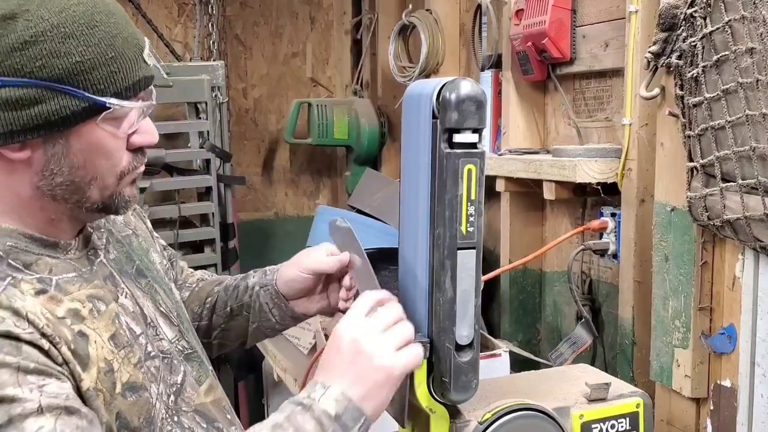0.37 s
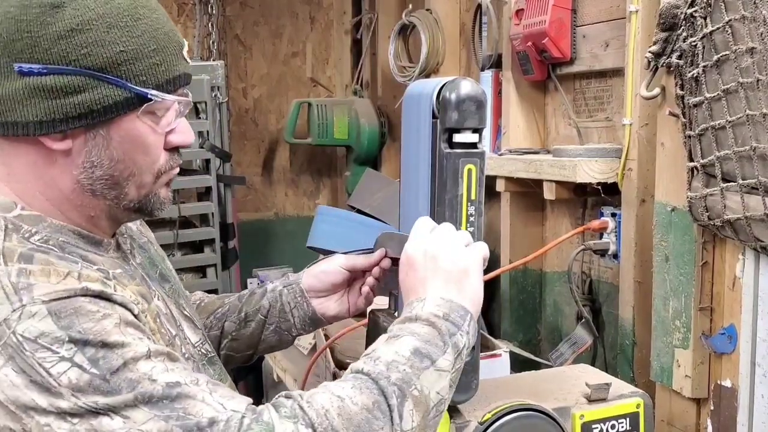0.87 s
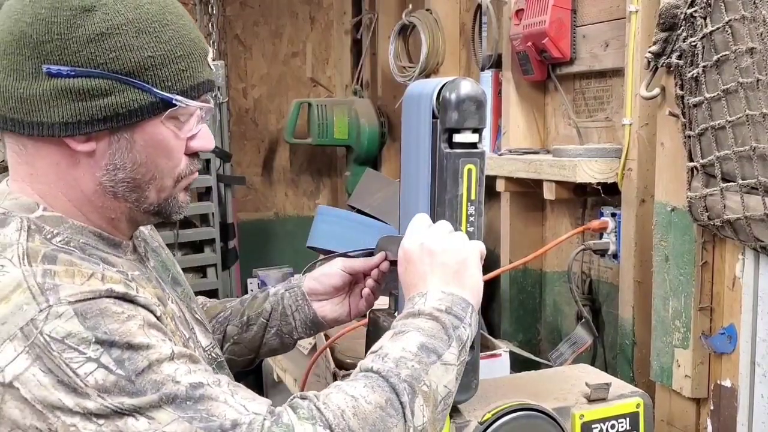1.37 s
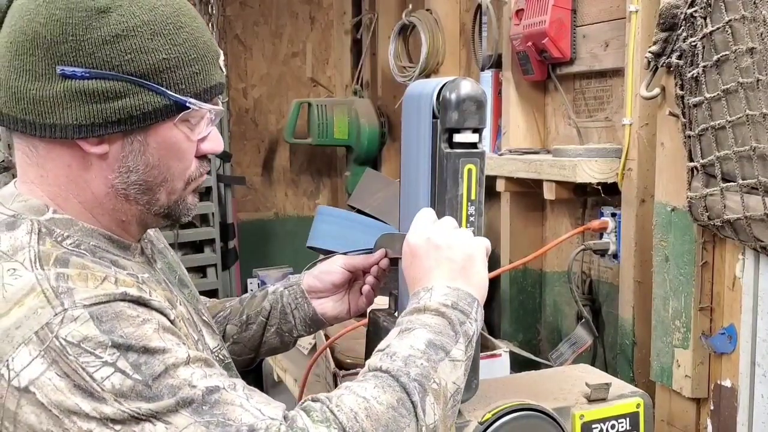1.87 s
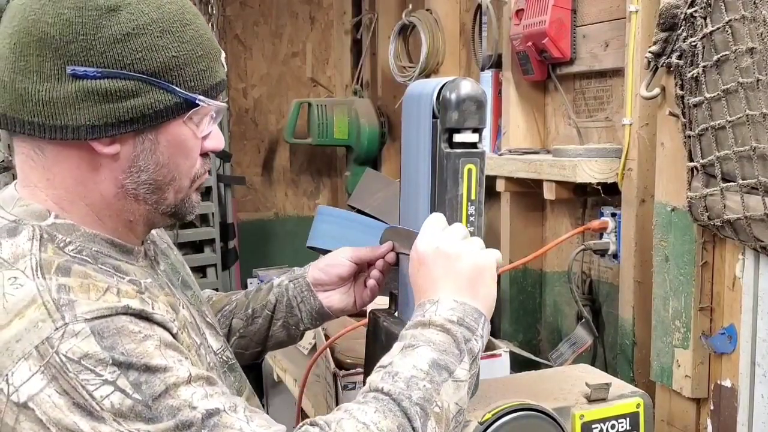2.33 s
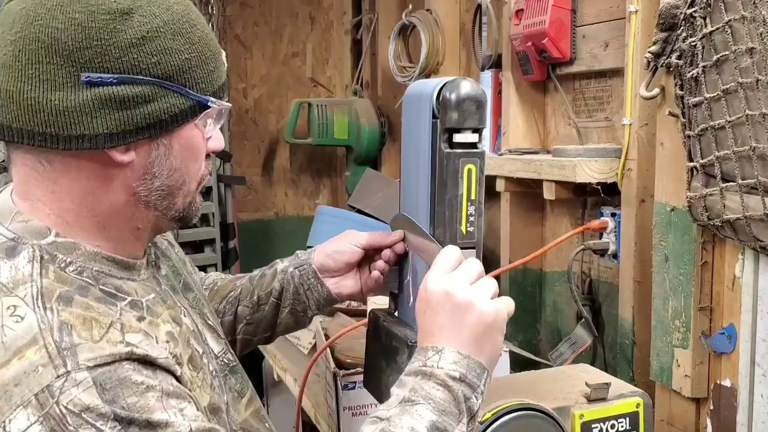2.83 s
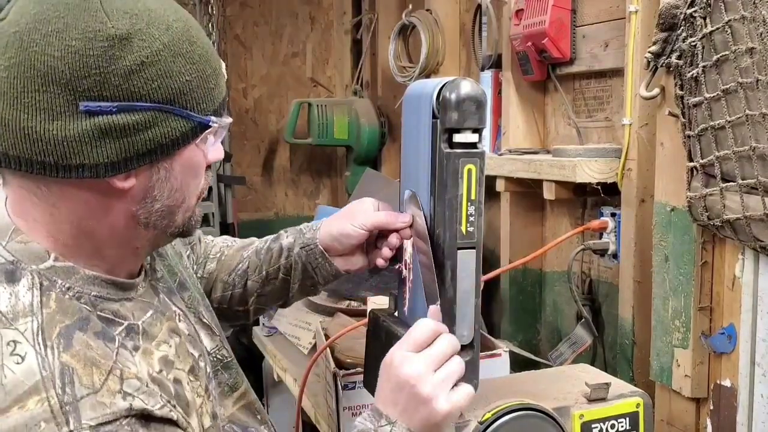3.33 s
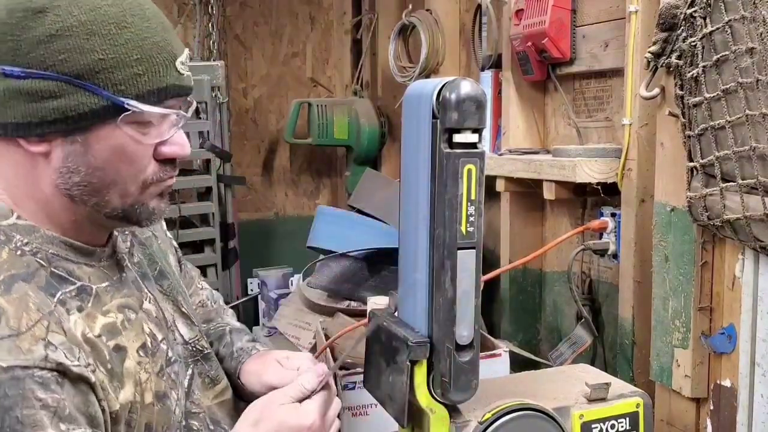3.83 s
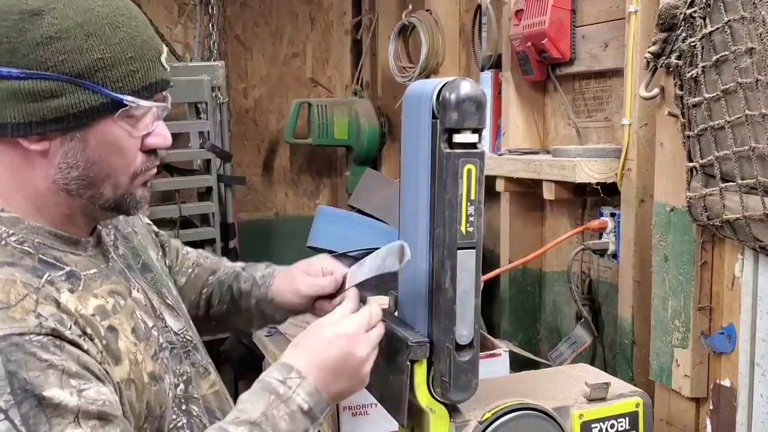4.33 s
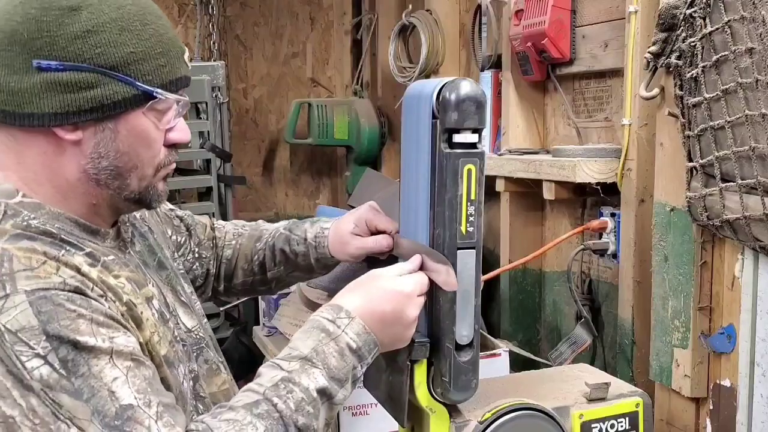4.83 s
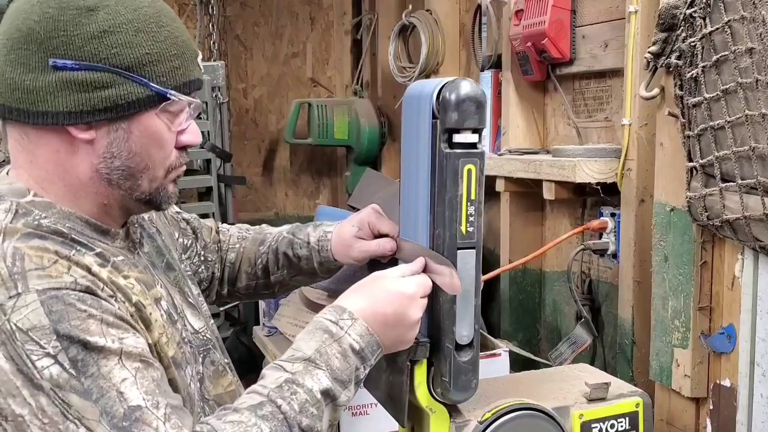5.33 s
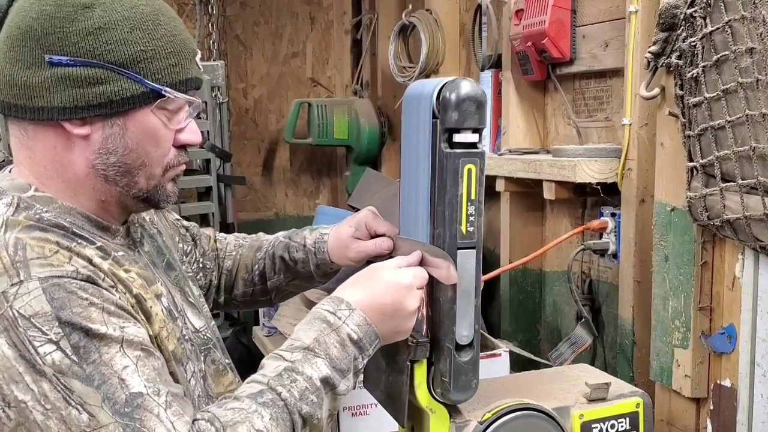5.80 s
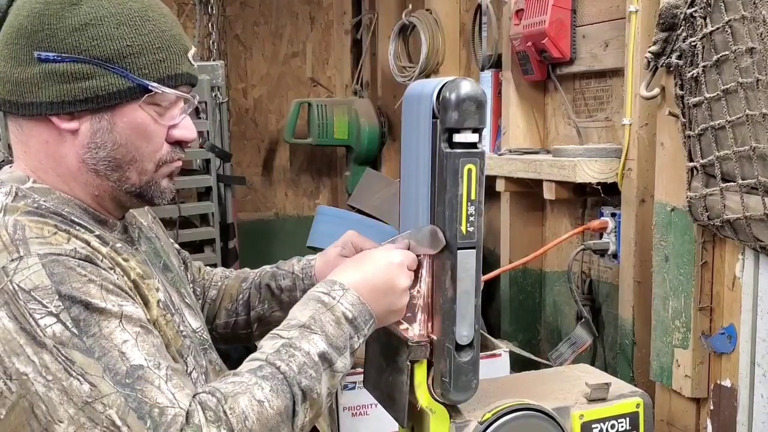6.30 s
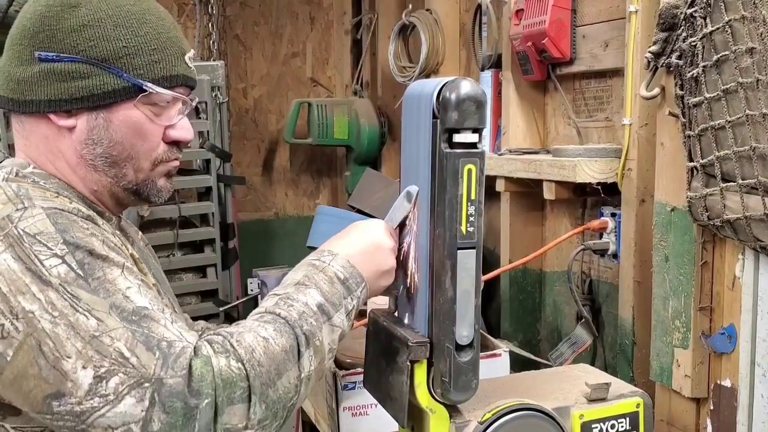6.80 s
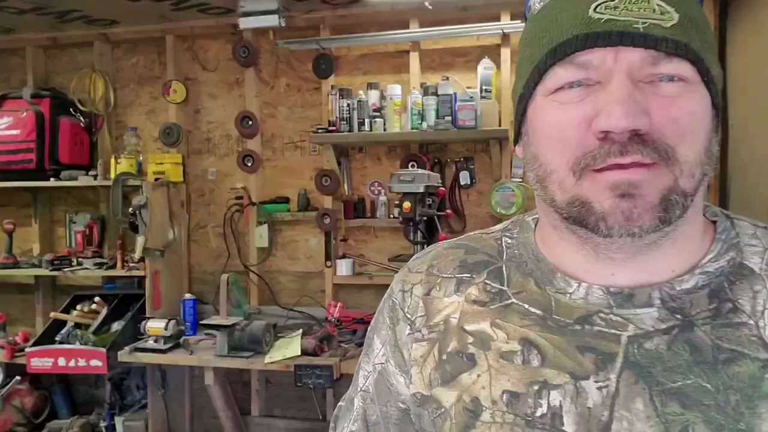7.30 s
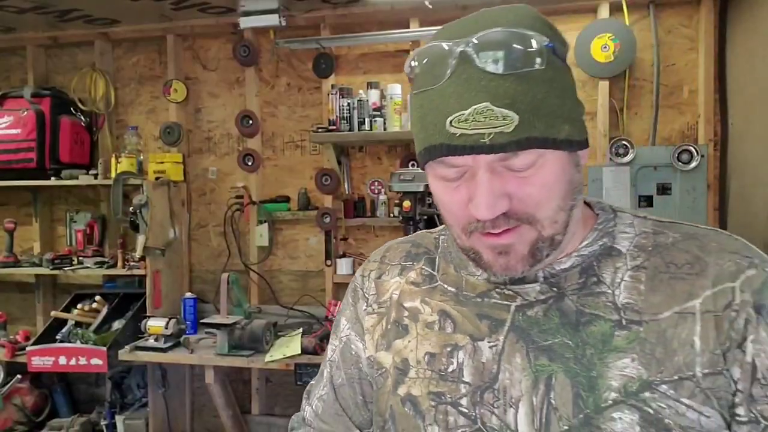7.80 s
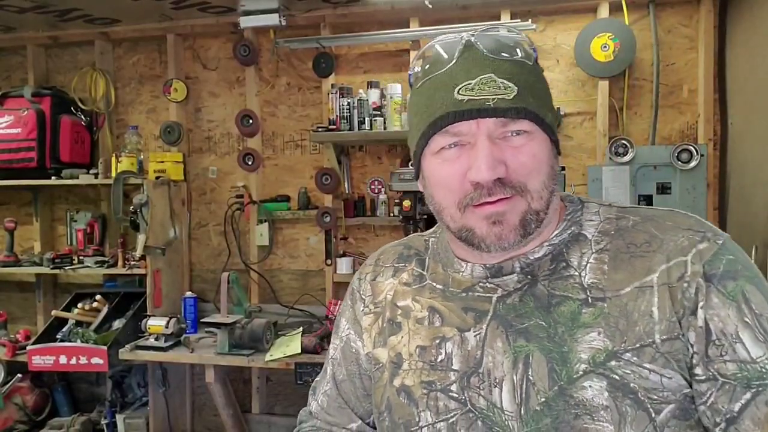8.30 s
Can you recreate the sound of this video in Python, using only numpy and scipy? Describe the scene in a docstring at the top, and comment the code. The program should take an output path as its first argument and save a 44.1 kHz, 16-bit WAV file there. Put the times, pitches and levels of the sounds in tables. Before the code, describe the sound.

A bench belt sander is already running close by in a wooden workshop: deep throbbing hum near 60 Hz, a whine around 950 Hz leaning left, broad belt rush and bench rumble. Between 0.2 and 1.4 s, brief thin squeaks from the belt seam flick by, stronger on the right. At about 1.8 s a steel blade touches the belt with bright gritty hiss and scrape; the whine sags slightly and the grinding surges from 2.5 s, its metallic resonance shifting as contact slides to the tip, until 3.9 s. The machine runs freely again, rumble returning. A second pass starts near 5.7 s, swelling in harsh bursts from 6.1 s. At 7.3 s everything fades almost instantly. Faint air settles quickly over a soft, far 70 Hz drone with tiny dips; a short sleeve rustle brushes past at 8.25 to 8.4 s. Two spaced microphones give a wide image.

```python
"""A bench belt sander runs in a wooden workshop: throbbing mains hum, whine partials, shaped-noise belt rush
and bench rumble, with brief noise squeaks from the belt seam. Two microphones set apart hear it.
A steel blade is ground in two passes, noise shaped by bending modes as the contact slides to the tip.
The sander then fades out quickly to the quiet shop: a low sine drone over air noise, then a noise rustle of cloth."""
import sys
import numpy as np
from scipy import signal
from scipy.fft import rfft, irfft, next_fast_len
from scipy.io import wavfile
from scipy.ndimage import uniform_filter1d, map_coordinates

SR = 44100
rng = np.random.default_rng(int(sys.argv[2]) if len(sys.argv) > 2 else 0)


def transcribe(u):
    """Save the signal u as a 16-bit wav file named by the first command-line argument.

    u: samples, shape (n,) or (channels, n), limited to [-1, 1]; the rate is SR.
    q: integer samples, one column per channel.
    """
    v = np.clip(np.atleast_2d(u).T, -1, 1)
    q = np.round(v * 32767).astype(np.int16)
    wavfile.write(sys.argv[1], SR, q)


def undo_db(level):
    """Turn decibels back into plain size, where 20 dB means ten times bigger."""
    steps = np.asarray(level, float) / 20
    return 10 ** steps


N = 370880
T_S = np.arange(N) / SR

# Noise spectra hold relative densities: each noise is scaled to rms 1 before its level is set.

# running machine, duller under the blade, before steps and wavers:
# (time [s], belt rush [dB], whine [dB], hum [dB])
MACHINE = [(0.0, -24, -27, -15.5), (0.57, -24, -27.5, -17), (1.5, -24.5, -27, -15), (1.96, -26, -28.5, -18),
           (2.04, -31, -31, -19.5), (2.45, -33, -30, -24.5), (2.8, -33.5, -30, -24.5),
           (3.25, -35.5, -35.5, -32), (3.89, -33, -35.5, -28.5), (3.96, -32, -34, -22),
           (4.45, -29, -33.5, -22.5), (4.6, -25.5, -27, -16.5), (5.3, -24.5, -29, -17),
           (5.79, -24.5, -28, -23), (5.89, -33, -36, -23), (6.2, -34, -32.5, -32.5),
           (6.6, -35.5, -32.5, -34), (6.95, -30.5, -31.5, -26.5), (7.32, -33.5, -33, -28.5)]
# right microphone's hum lag: (time [s], phase [rad])
HUM_LAG = [(0, 1.6), (2.4, 1.84), (4.4, 2.16), (5.6, 2.6), (7.32, 2.8)]
# motor whine: (time [s], frequency [Hz])
WHINE_SPEED = [(0, 954), (1.7, 954), (2.3, 951), (2.5, 947), (3.15, 946.5), (3.3, 949.5), (3.85, 949),
               (4, 954), (5.65, 954), (6, 951.5), (6.2, 948), (6.9, 948), (7.05, 950.5), (7.35, 950)]
# whine partials: (multiple of whine, level over whine [dB], right over left [dB], flicker scale [dB])
WHINE_PARTIALS = [(1, 6.5, -28, -0.75), (1.125, -12.5, -2, 4), (.876, -13.5, -10, 5), (1.5, -15.5, -5, 5),
                  (1.947, -16.5, 4.5, 1), (2.831, -18, -5.5, 6)]
# belt rush: (frequency [Hz], density [dB per Hz])
BELT_SPECTRUM = [(330, -63.5), (430, -12), (520, -9), (764, -12), (958, -3), (1260, -14), (1650, -14.5),
                 (2260, -17.5), (3000, -18.5), (5000, -20), (7500, -29), (9500, -26), (12000, -30.5),
                 (14600, -37.5)]
# housing resonances: (frequency [Hz], width [Hz], gain [dB])
HOUSING_MODES = [(681, 48, 8), (834, 350, 2), (1877, 150, 10.5), (2713, 44, 9.5)]
# belt rush treble in each microphone: (frequency [Hz], left [dB], right [dB])
BELT_TREBLE = [(9340, -0.7, -0.9), (10340, -6, 1.5), (11500, 4.5, 2.7), (12400, 3, 2), (13400, 1, -21),
               (14300, -9, -33)]
# bench, before steps and wavers: (time [s], rumble [dB], drumming of its top over rumble [dB])
BENCH_LEVELS = [(0.0, -30.5, -4.5), (1.7, -31, -6.5), (2.3, -46, -6.5), (2.5, -44.5, -22),
                (3.2, -47.5, -30), (3.6, -47.5, -20), (3.9, -40.5, -10), (4.5, -33.5, -9),
                (4.7, -29, -10.5), (5.75, -32.5, -5.5), (5.94, -47.5, -16), (6.1, -47.5, -22),
                (6.6, -50, -24), (6.95, -44.5, -8.5), (7.32, -46, -3)]
# bench rumble: (frequency [Hz], density [dB per Hz])
RUMBLE_SPECTRUM = [(70, -28), (100, -4), (125, -3), (190, -9), (285, -4.5), (310, -8.5), (340, -55.5)]
# bench top drumming: (frequency [Hz], density [dB per Hz])
BENCH_TOP_SPECTRUM = [(270, -36.5), (320, 0.5), (420, 5), (480, -26)]
# deep shaking of the floor: (frequency [Hz], density [dB per Hz])
SHUDDER_SPECTRUM = [(22, -32), (35, -6.5), (60, 0), (90, -4), (115, -44)]
# belt seam squeaks over a roller: (time [s], peak of swell [dB], Gaussian sd [s])
SQUEAKS = [(0.233, -42, .015), (.29, -43, 0.026), (0.356, -33, .02), (0.48, -36, .01), (.685, -34.5, 0.013),
           (0.908, -40.5, .01), (1.012, -33, 0.018), (1.075, -39.5, 0.0092), (1.147, -43.5, .006),
           (1.222, -43, .006), (1.416, -40, 0.028)]
# blade on the belt, one table a pass, before steps: (time [s], grit hiss [dB], blade body over hiss [dB])
GRIND_PASSES = [
    [(1.755, -46, 0), (1.78, -20.5, -11.5), (1.85, -25.5, -4), (2.1, -17.5, -12.5), (2.2, -19, -7.5),
     (2.8, -21.5, -5.5), (3.18, -18.5, -10), (3.3, -16, -8.5), (3.6, -17.5, -7), (3.89, -21.5, -5.5),
     (3.925, -38, 0)],
    [(5.678, -45.5, -1.5), (5.688, -25, -9.5), (5.76, -24, -4.5), (5.85, -16, -10), (6.05, -18.5, -8.5),
     (6.15, -19, -8), (6.3, -19.5, -8), (6.6, -20.5, -5), (6.95, -21, -5), (7.32, -24.5, 1)],
]
# grit hiss: (frequency [Hz], density [dB per Hz])
GRIT_SPECTRUM = [(4500, -55), (6500, -9), (8000, -4.5), (9500, -2), (12000, -0.5), (14600, -8.5)]
# blade scrape: (frequency [Hz], density [dB per Hz])
SCRAPE_SPECTRUM = [(1300, -27.5), (1900, -2.5), (2400, -10.5), (2900, -5), (3800, -0.5), (5500, -1),
                   (7000, -8.5), (9000, -14.5)]
# contact sliding to the tip, one table a pass:
# (time [s], distance from tip [bending half-waves at 3 kHz], share shaped by bending [0-1])
CONTACT_SLIDES = [
    [(1.75, 4.5, .12), (3.05, 3.2, .2), (3.25, 2.7, .5), (3.35, 2.2, .6), (3.45, 1.73, .68),
     (3.55, 1.3, .72), (3.6, 1.1, .72), (3.7, .92, .62), (3.92, .75, .5)],
    [(5.7, 4.2, .12), (6.2, 3.1, .3), (6.4, 2.85, .58), (6.5, 2.6, .62), (6.65, 2.1, .68),
     (6.83, 1.73, .68), (6.9, 1.3, .72), (6.97, 1.05, .72), (7.1, .9, .58), (7.35, .8, .5)],
]
# bending modes of the blade: (frequency [Hz], width [Hz], gain [dB])
STEEL_MODES = [(2710, 70, 10), (3140, 70, 13), (3680, 70, 17), (4240, 75, 15), (4740, 75, 12),
               (5254, 70, 17), (5857, 75, 15), (6610, 85, 15), (7500, 90, 11), (8400, 95, 13),
               (9130, 95, 12), (10000, 100, 11), (10850, 105, 13), (11560, 110, 13), (12620, 110, 15)]
# level steps up and back: (start [s], end [s], gain [dB])
LEVEL_STEPS = [(2.473, 2.673, 10), (2.726, 3.201, 10), (3.392, 3.617, 3.5), (3.633, 3.889, 7.5),
               (6.073, 6.258, 9), (6.61, 6.724, 9.5), (6.744, 6.855, 10), (6.915, 7.4, 7.5)]
# sander fade-out: (start [s], end [s])
FADE_S = (7.318, 7.352)
# quiet shop: (start [s], end [s])
QUIET_S = (7.37, 8.41)
# brief drone dips: (time [s], depth [dB], Gaussian sd [s])
DRONE_DIPS = [(7.61, 4, .02), (7.92, 10.5, 0.016), (8.03, 6.5, 0.014), (8.133, 4, 0.037)]
# still air: (frequency [Hz], density [dB per Hz])
AIR_SPECTRUM = [(30, -25.5), (60, -23), (110, -18.5), (181, -28), (565, -32), (1520, -37.5), (2000, -44.5),
                (2640, -53), (5000, -44.5), (7000, -51), (9000, -52), (14000, -58.5)]
# thin band in the air: (frequency [Hz], width [Hz], gain [dB])
AIR_BAND = [(1690, 77, 13)]
# cloth rustle: (time [s], swish [dB], body over swish [dB])
RUSTLE_LEVELS = [(8.244, -89, 4), (8.252, -65.5, -1.5), (8.268, -48.5, -8.5), (8.324, -46, 2),
                 (8.41, -65, 1.5)]
# cloth swish: (frequency [Hz], density [dB per Hz])
SWISH_SPECTRUM = [(1060, -49), (1800, -12.5), (2310, -14), (2690, -17.5), (3170, -10.5), (7230, -25),
                  (7950, -19), (14000, -23.5)]
# cloth body: (frequency [Hz], density [dB per Hz])
CLOTH_SPECTRUM = [(150, -24), (350, -3.5), (1100, -1.5), (2200, -19), (3000, -43.5)]
# colour of each microphone: (frequency [Hz], left [dB], right [dB])
MIC_COLOUR = [(300, 1, 2), (1000, -0.5, -0.5), (5430, 1.66, 2.5), (5700, -6, 5), (6100, -10.5, 6.5),
              (6520, 0, 4.5), (7140, 0.5, -3), (7740, -5.5, 0), (8970, 4, -5.5), (9500, -10, 3),
              (10270, -9, 3), (10800, -1.5, -1.5), (11350, -1, -1.5), (13800, 3, -6), (14600, -5, -10.5)]

HUM_HZ, ROLLER_HZ, FLUTTER_HZ, TOP_HZ = 59.8, 25.38, 93.75, 14650
# the hum wavers more, per dB, the further it sinks under the steady level
HUM_WAVER_DB, HUM_WAVER_DB_PER_DB, HUM_STEADY_DB = 1.1, 0.2, -18.5
# share of a level step that each layer takes; the grinding takes all of it
BELT_STEPS, WHINE_STEPS, HUM_STEPS, BENCH_STEPS = 0.93, 0.35, 0.3, 0.79
STEP_EDGE_S = 0.022
SHUDDER_OVER_RUMBLE_DB = -7
DRONE_DB, DRONE_RISE_S = -44.5, 0.03
AIR_DB, AIR_START_EXTRA_DB, AIR_SETTLE_S = -58.5, 15, 0.076


def unit(x):
    """Scale to rms 1."""
    return x / np.sqrt(np.mean(x ** 2) + 1e-20)


def along(points, hz):
    """Read (Hz, value, ..) points on a log frequency axis."""
    f, *cols = np.transpose(points)
    return np.array([np.interp(np.log(hz + 1), np.log(f + 1), v) for v in cols])


def curves(rows):
    """One value per sample for each column after the time."""
    s, *cols = np.transpose(rows)
    return [np.interp(T_S, s, c) for c in cols]


def sounding(start_s, end_s):
    """Gate: 1 from start until 40 ms after end, with 5 ms edges outside."""
    return np.clip(np.minimum(T_S - start_s + .005, end_s - T_S + .045) / .005, 0, 1)


def bumps(centre_s, sd_s):
    """Gaussian swell of peak 1."""
    return np.exp(-.5 * ((T_S - centre_s) / sd_s) ** 2)


def wobble(rate_hz):
    """Smooth random curve, rate_hz knots a second."""
    knots = rng.standard_normal(int(N * rate_hz / SR) + 4)
    return map_coordinates(knots, [np.arange(N) * rate_hz / SR])


def resonances_db(modes, hz):
    """Sum of resonance peaks in dB."""
    return sum(db / (1 + (2 * (hz - c) / w) ** 2) for c, w, db in modes)


def rush(spectrum, modes=(), alike=0., patchy_db=0., tall=6, long=12):
    """Stereo noise of rms 1 with random patches of gain, tall bins by long frames."""
    z = signal.stft(rng.standard_normal((2, N)), nperseg=512)[2]
    field = rng.standard_normal(z.shape)
    field = uniform_filter1d(field, int(tall), 1)
    field = uniform_filter1d(field, int(long), 2)
    a, b = signal.istft(z * undo_db(patchy_db * unit(field)), nperseg=512)[1][:, :N]
    alike = np.clip(alike, 0, 1)  # correlation of the channels
    pair = [a, alike * a + np.sqrt(1 - alike ** 2) * b]
    hz = np.fft.rfftfreq(N, 1 / SR)
    level_db = along(spectrum, hz) + resonances_db(modes, hz)
    return unit(irfft(rfft(pair) * undo_db(level_db), N))


def coloured(x, points, top_hz=SR):
    """Filter x through (Hz, dB) points, one column a channel; nothing from top_hz up."""
    size = next_fast_len(N + 8192)
    hz = np.fft.rfftfreq(size, 1 / SR)
    return irfft(rfft(x, size) * undo_db(along(points, hz)) * (hz < top_hz), size)[:, :N]


def steps_db():
    """Gain inside the level steps, with short ramps."""
    return sum(db * np.clip(np.minimum(T_S - start, end - T_S) / STEP_EDGE_S + .5, 0, 1)
               for start, end, db in LEVEL_STEPS)


def mains_hum():
    """Hum throbs with the idler roller's wobble, as unequal sidebands, and reaches the far microphone late."""
    _, _, hum_db = curves(MACHINE)
    waver_db = HUM_WAVER_DB + HUM_WAVER_DB_PER_DB * np.maximum(HUM_STEADY_DB - hum_db, 0)
    lag_rad, = curves(HUM_LAG)
    heard_s = T_S - np.array([0 * lag_rad, lag_rad]) / (2 * np.pi * HUM_HZ)
    roller = 2 * np.pi * ROLLER_HZ * heard_s
    throb = 1 + 0.32 * np.exp(1j * roller) + 0.39 * 0.32 * np.exp(-1j * roller)
    tone = np.imag(throb * np.exp(2j * np.pi * HUM_HZ * heard_s))
    return undo_db(hum_db + HUM_STEPS * steps_db() + waver_db * wobble(9.9)) * tone


def motor_whine():
    """Flickering partials sag as the blade loads the shaft; the idler roller's wobble throbs them."""
    _, whine_db, _ = curves(MACHINE)
    whine_hz, = curves(WHINE_SPEED)
    turn = 2 * np.pi * np.cumsum(whine_hz) / SR
    whine = 0
    for multiple, db, right_db, flicker_db in WHINE_PARTIALS:
        waver = np.array([wobble(9), wobble(9)])
        tone = np.sin(multiple * (turn + .2 * waver))
        whine = whine + undo_db(db + flicker_db * wobble(18)) * undo_db([[0], [right_db]]) * tone
    throb = 1 + 0.31 * np.cos(2 * np.pi * ROLLER_HZ * T_S)
    return undo_db(whine_db + WHINE_STEPS * steps_db()) * throb * whine


def belt_rush():
    """Air and belt rush through the resonant housing: patchy coloured noise."""
    rush_db = curves(MACHINE)[0]
    noise = coloured(rush(BELT_SPECTRUM, HOUSING_MODES, patchy_db=2.5, tall=2, long=20), BELT_TREBLE)
    return undo_db(rush_db + BELT_STEPS * steps_db() + 0.91 * wobble(30)) * noise


def bench_rumble():
    """Bench rumbles, its top drums and the floor shakes: three low noise bands."""
    rumble_db, top_db = curves(BENCH_LEVELS)
    rumble_db = rumble_db + BENCH_STEPS * steps_db() + 1.9 * wobble(12)
    top_db = top_db + 2.2 * wobble(10)
    rumble = rush(RUMBLE_SPECTRUM, alike=0.14) + undo_db(top_db) * rush(BENCH_TOP_SPECTRUM)
    shudder = rush(SHUDDER_SPECTRUM)[0] * [[1], [-1]]  # opposite phase in the microphones
    return undo_db(rumble_db) * rumble + undo_db(rumble_db + SHUDDER_OVER_RUMBLE_DB) * shudder


def seam_squeaks():
    """Belt seam squeaks over a roller: Gaussian swells of narrow noise, louder on the right."""
    swell = sum(undo_db(db) * bumps(s, sd_s) for s, db, sd_s in SQUEAKS)
    noise = rush([(9000, -40), (9450, 2.5), (9900, -1.5), (10500, -38.5)])
    return swell * undo_db([[-9], [0]]) * noise


def bending(x, slide):
    """Contact drives each bending wave as strongly as the blade moves there, and the modes ring out."""
    hz, t, z = signal.stft(x, SR, nperseg=1024)
    hz = hz[:, None]
    s, place, share = np.transpose(slide)
    place = np.interp(t, s, place)
    share = np.clip(np.interp(t, s, share), 0, 1)
    shape = np.sin(np.pi * np.sqrt(hz / 3000) * place) ** 2  # waves shorten as the root of pitch
    modes = undo_db(resonances_db(STEEL_MODES, hz))
    return signal.istft(z * (1 - share + .55 * share * shape * modes), SR, nperseg=1024)[1][:, :N]


def grinding():
    """Grit tears at the steel: spiky hiss on top, broad scrape below, both shaped by the blade."""
    sparks = undo_db(1.6 * wobble(900) + 0.53 * wobble(25))  # uneven grit roughens the hiss
    hiss = unit(sparks * rush(GRIT_SPECTRUM, patchy_db=2.0, tall=2.5, long=14))
    scrape = rush(SCRAPE_SPECTRUM, patchy_db=3.5, tall=1, long=12)
    flutter = 1 + 0.073 * np.cos(2 * np.pi * FLUTTER_HZ * T_S)
    out = 0
    for rows, slide in zip(GRIND_PASSES, CONTACT_SLIDES):
        hiss_db, body_db = curves(rows)
        contact = bending(hiss + undo_db(body_db) * scrape, slide)
        out = out + undo_db(hiss_db + steps_db()) * flutter * contact * sounding(rows[0][0], rows[-1][0])
    return out


def far_drone():
    """A far machine drones: a sine wandering near 70 Hz, with brief dips."""
    level_db = DRONE_DB - sum(db * bumps(s, sd_s) for s, db, sd_s in DRONE_DIPS)
    rise = np.clip((T_S - QUIET_S[0]) / DRONE_RISE_S, 0, 1)
    tone = np.sin(2 * np.pi * np.cumsum(70 + 1.5 * wobble(8)) / SR)
    return undo_db(level_db) * rise * tone * sounding(*QUIET_S)


def still_air():
    """Air noise with a thin band starts loud and settles exponentially in dB."""
    since_s = np.maximum(T_S - QUIET_S[0], 0)
    level_db = AIR_DB + AIR_START_EXTRA_DB * np.exp(-since_s / AIR_SETTLE_S)
    noise = rush(AIR_SPECTRUM, AIR_BAND, alike=0.53, patchy_db=2.5)
    return undo_db(level_db) * noise * sounding(*QUIET_S)


def cloth_rustle():
    """A sleeve brushes past: patchy high swish over a lower noise body."""
    swish_db, body_db = curves(RUSTLE_LEVELS)
    swish = rush(SWISH_SPECTRUM, alike=.2, patchy_db=4.5, tall=2.5, long=3)
    body = rush(CLOTH_SPECTRUM, alike=0.6, tall=3, long=3)
    cloth = undo_db(swish_db) * swish + undo_db(swish_db + body_db) * body
    return cloth * sounding(RUSTLE_LEVELS[0][0], RUSTLE_LEVELS[-1][0])


def scene():
    """Sander and blade, faded out; then the quiet shop."""
    sander = mains_hum() + motor_whine() + belt_rush() + bench_rumble() + seam_squeaks()
    fade = np.interp(T_S, FADE_S, [1, 0]) ** 2
    return (sander + grinding()) * fade + far_drone() + still_air() + cloth_rustle()


def low_pass(x):
    """Removes everything above the highest recorded frequency."""
    return signal.sosfilt(signal.butter(12, 15050, fs=SR, output="sos"), x)


def record(dry):
    """Colour each microphone, limit the band and clip at full scale."""
    mix = np.clip(coloured(dry, MIC_COLOUR, TOP_HZ), -1, 1)
    return low_pass(mix)


dry = scene()
out = record(dry)
transcribe(out)
```